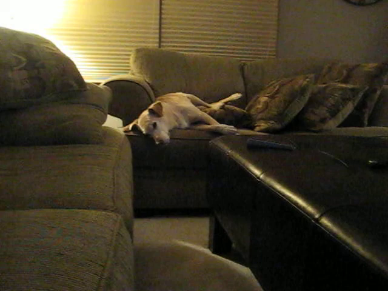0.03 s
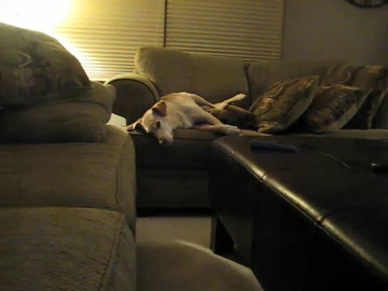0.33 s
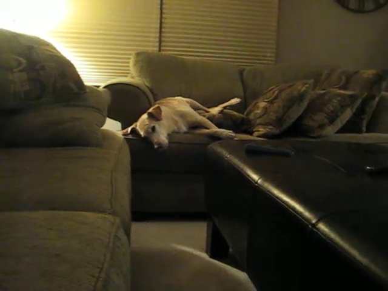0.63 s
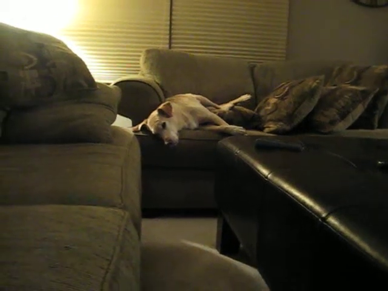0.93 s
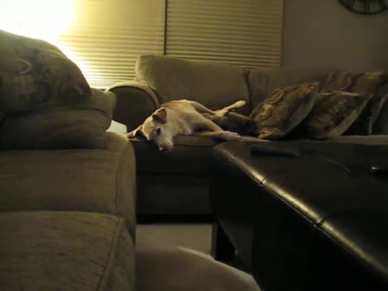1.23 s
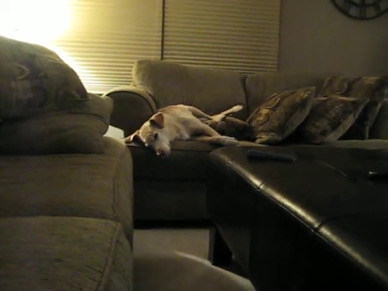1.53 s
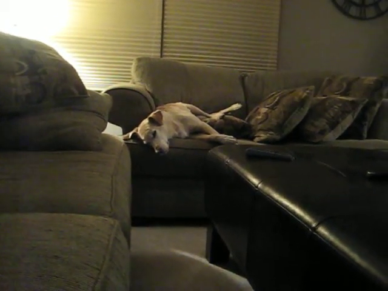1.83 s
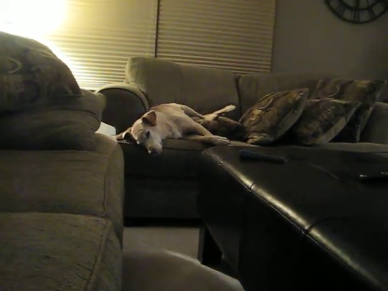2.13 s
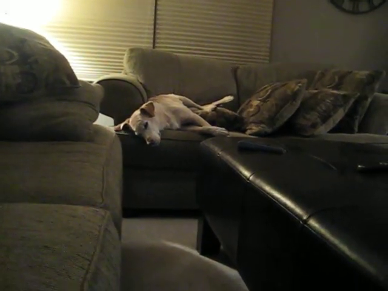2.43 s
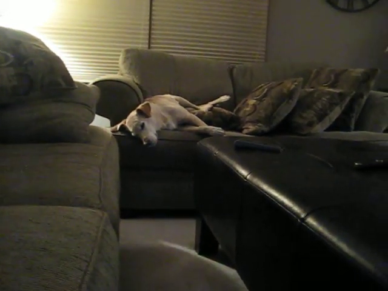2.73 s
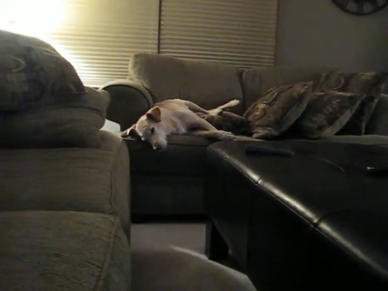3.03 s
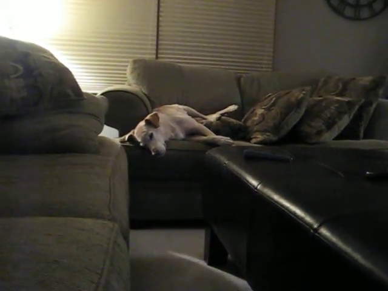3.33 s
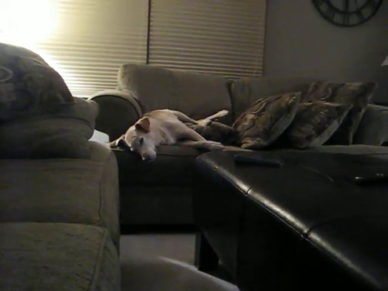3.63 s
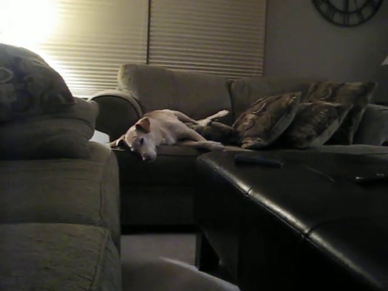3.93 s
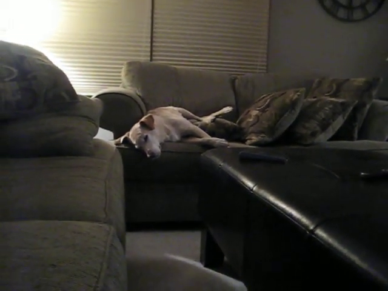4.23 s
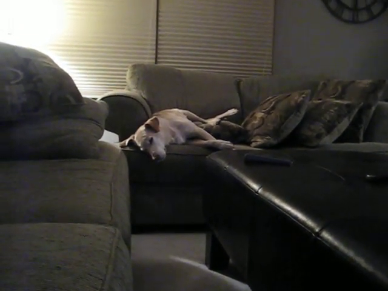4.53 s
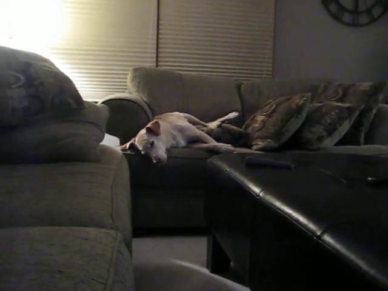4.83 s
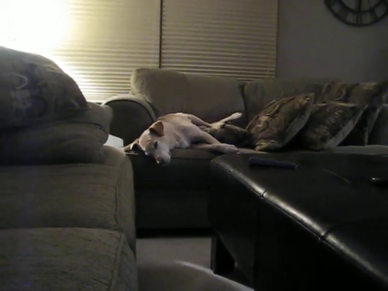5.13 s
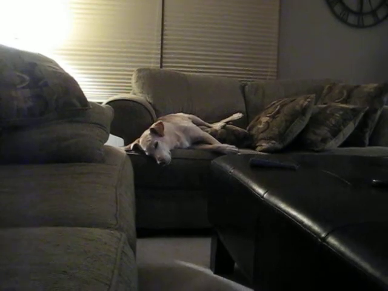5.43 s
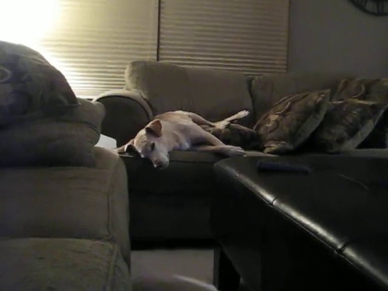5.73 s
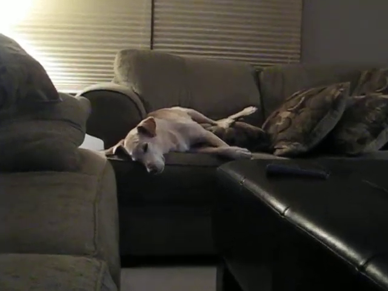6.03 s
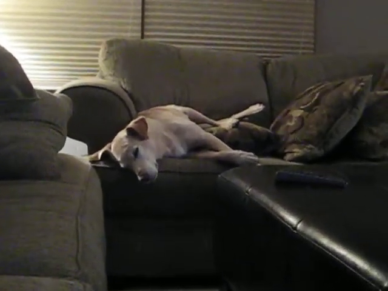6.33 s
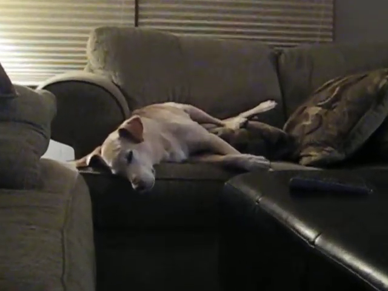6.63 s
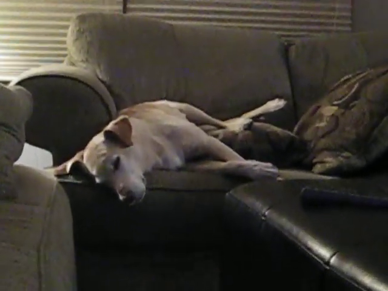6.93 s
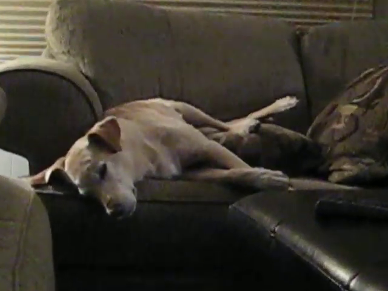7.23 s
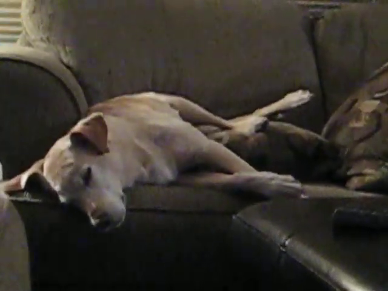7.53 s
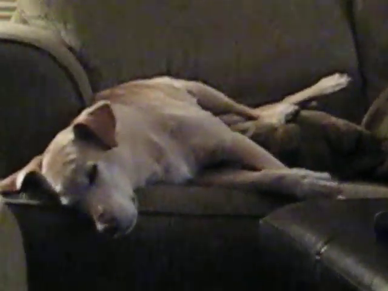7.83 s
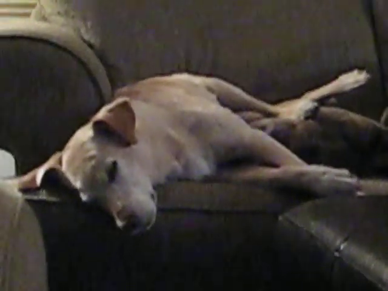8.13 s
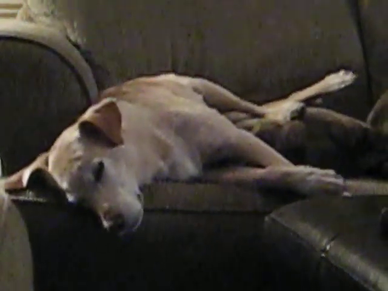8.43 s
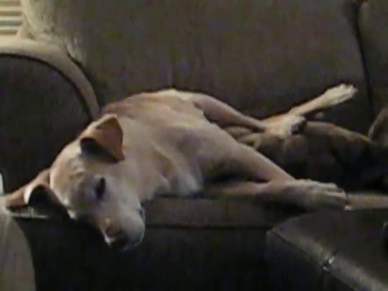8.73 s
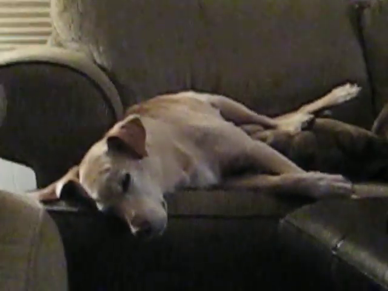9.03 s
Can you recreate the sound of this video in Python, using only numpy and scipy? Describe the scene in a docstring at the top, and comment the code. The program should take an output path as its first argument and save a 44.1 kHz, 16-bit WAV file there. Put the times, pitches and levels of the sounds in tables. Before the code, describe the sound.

Steady microphone hiss and a few close plastic clicks surround a single closed-mouth huff from a sleeping dog.

```python
"""A sleeping dog's huff

A dog asleep on a couch gives one muffled, closed-mouth huff: its loose vocal folds flap in a rough
grunt, then tighten into a short hoot. The living room is quiet under the steady hiss and faint whine
of a handheld camera. The sound starts with a dull click, a soft bump and a fading ring; then fingers
and the zoom lever click on the plastic case."""
import sys
import numpy as np
from scipy import signal
from scipy.fft import rfft, irfft, next_fast_len
from scipy.io import wavfile
from scipy.ndimage import map_coordinates

SR = 44100
rng = np.random.default_rng(int(sys.argv[2]) if len(sys.argv) > 2 else 0)


def to_wav(sig):
    """Store sig (one row per channel, or 1-D mono) as 16-bit WAV at the path in sys.argv[1].

    Samples outside -1..1 are clipped; the rate is SR.
    """
    pcm = np.clip(np.atleast_2d(sig), -1, 1) * 32767
    pcm = np.round(pcm).astype(np.int16)
    wavfile.write(sys.argv[1], SR, pcm.T)  # frames by channels


N = 404838
START_S = .0725  # the camera's sound begins


def amp(db):
    """Turn decibels into a gain."""
    return 10 ** (np.asarray(db) / 20)


def unit(x):
    """Scale a sound to an average (rms) level of 1."""
    return x / np.sqrt(np.mean(x ** 2) + 1e-20)


def clock():
    """The time of every sample, in seconds."""
    return np.arange(N) / SR


def along(points, hz):
    """Read between (frequency, value) points on a log frequency scale."""
    f, v = np.transpose(points)
    return np.interp(np.log(hz + 1), np.log(f + 1), v)


def wobble(rate):
    """A smooth curve through `rate` random values a second."""
    return map_coordinates(rng.standard_normal(int(N * rate / SR) + 4), [clock() * rate])


def fade(t, t60):
    """Die away by 60 dB in t60 seconds, the fade time."""
    return np.exp(-np.log(1000) * t / t60)


def filtered(x, response):
    """Shape a sound; response(f) says how each frequency gets through."""
    size = next_fast_len(N + SR // 2)
    return irfft(rfft(x, size) * response(np.fft.rfftfreq(size, 1 / SR)), size)[:N]


def resonance(f, centre, width):
    """A filter shape that favours frequencies near its centre."""
    return 1j * f * width / (centre ** 2 - f ** 2 + 1j * f * width)


def noise(spectrum):
    """Noise of level 1, shaped by (frequency [Hz], level [dB]) points."""
    return unit(filtered(rng.standard_normal(N), lambda f: amp(along(spectrum, f))))


# the microphone's hiss: (frequency [Hz], relative level [dB])
HISS_SHAPE = [(15, -41), (25, -7.5), (64, -5), (144, -3), (403, -1), (449, -1.5), (791, -1), (881, -2),
              (1040, -1), (1120, -2), (2150, -3.5), (7630, -10), (12700, -16.5), (14600, -15.5),
              (15800, -17.5)]
# thin tones from the electronics: (frequency [Hz], level [dB])
WHINE_TONES = [(1066, -74), (7558, -93), (7881, -90), (15122, -79), (15149, -83)]


def hiss_and_whine(hiss_db=-52, drift=.5):
    """The microphone hisses evenly under the slightly unsteady whine of the electronics."""
    whine = sum(amp(db) * unit(np.sin(2 * np.pi * hz * clock() + drift * wobble(12)))
                for hz, db in WHINE_TONES)
    return amp(hiss_db) * noise(HISS_SHAPE) + whine


def start_ring(ring_hz=968, ring_db=-45, bump_hz=490, bump_db=-40):
    """A soft bump and a thin, fading ring sound as the camera starts."""
    t = np.maximum(clock() - START_S, 0)
    ring = amp(ring_db) * np.sin(2 * np.pi * ring_hz * t) * fade(t, t60=1.16)
    bump = amp(bump_db) * np.sin(2 * np.pi * bump_hz * t) * fade(t, t60=.058)
    return ring + bump


# the tones the plastic case rings at: (frequency [Hz], relative level [dB], fade time [s])
CASE_TONES = [(151, -22, 0.025), (386, -22, 0.054), (679, -4, 0.028), (990, 1, 0.013), (1385, -2.5, 0.012),
              (1806, -4.5, 0.019), (2804, 0, 0.0083), (3600, -1, 0.0079), (3840, -7.5, 0.017),
              (4500, -4, 0.0065), (5680, -8.5, 0.0057), (7500, -13.5, 0.004), (11000, -17.5, 0.0028),
              (15400, -23, 0.0027)]
PIVOT_HZ = 1430  # a harder hit rings more above this frequency and less below


def strike(s, blow_db, ratio=1, scatter_db=1):
    """One hit at time s rings the case; blow_db is its strength at each tone."""
    out, t = np.zeros(N + SR), np.arange(SR // 4) / SR
    hz, tone_db, t60 = np.transpose(CASE_TONES)
    tones = np.sin(2 * np.pi * ratio * hz[:, None] * t)  # the grip detunes the case by `ratio`
    tones *= fade(t, t60[:, None])
    tones[1::2] *= -1  # neighbouring tones move the microphone in opposite directions
    gains = amp(tone_db + blow_db + scatter_db * rng.standard_normal(len(hz)))
    out[round(s * SR):][:len(t)] = gains @ tones
    return out[:N]


# dull bumps as the grip shifts: (time [s], level [dB])
GRIP_BUMPS = [(6.434, -45), (8.51, -40.5)]


def grip_bumps():
    """The soft hand rings only the two lowest tones of the case."""
    out = np.zeros(N)
    for s, db in GRIP_BUMPS:
        t = np.maximum(clock() - s, 0)
        out += amp(db) * sum(np.sin(2 * np.pi * hz * t) * fade(t, t60) for hz, _, t60 in CASE_TONES[:2])
    return out


# a dull click as the sound starts, then fingers tapping the case, the last row a small tick of the zoom lever
# just before it hits its stop: # (time [s], level [dB], hardness [dB per octave], tuning [ratio], bounces
# [count])
CLICK_AND_TAPS = [(0.0752, -35.5, -0.5, 0.97, 0), (0.1766, -23.5, 0.5, .91, 1), (.2121, -24.5, .6, 1.05, 2),
                  (2.574, -47.5, -7, 1.08, 0), (5.481, -45.5, -5.5, 1.02, 0), (5.6233, -44.5, 1, 1.1, 0),
                  (7.005, -35.5, -2.5, 1.05, 0), (7.284, -46, -5, .93, 0), (8.665, -43, -1, 1.1, 0),
                  (8.831, -30, -1.5, .95, 0)]


def click_and_taps(last_hop_s=.0025, hop_ratio=1.6, settle_loss_db=5.5, settle_tilt=3, settle_ratio=.88):
    """A click, then taps: soft ones ring low tones, hard ones high; some bounce faster and settle."""
    hz = np.transpose(CASE_TONES)[0]
    octaves = np.log2(np.clip(hz, 600, 5500) / PIVOT_HZ)
    out = np.zeros(N)
    for s, db, hardness, ratio, bounces in CLICK_AND_TAPS:
        for k in range(bounces + 1):
            blow_db = db + hardness * octaves
            if 0 < k == bounces:  # the last bounce is weaker, duller and lower
                blow_db -= settle_loss_db + settle_tilt * octaves
                ratio *= settle_ratio
            out += strike(s, blow_db, ratio)
            s += last_hop_s * hop_ratio ** (bounces - k - 1)
    return out


# the zoom lever hits its stop: (time [s], level [dB], hardness [dB per octave], extra snap [dB])
LEVER_CLICKS = [(7.342, -22, 1, 0.5), (8.8434, -18.5, 3, 15), (9.092, -14, -.5, 3)]
# the lever's blow, from bass to treble: (frequency [Hz], relative level [dB])
BLOW_SHAPE = [(150, -4), (600, -9), (1050, 1), (1900, -1.5), (2900, -5), (5500, -0.5), (15000, 1.5)]
# the lever's scrape: (frequency [Hz], relative level [dB])
SCRAPE_SHAPE = [(300, -17), (1050, 4), (1800, -1.0), (2500, -8), (3700, 2), (4800, -10), (5900, -5.5),
                (7200, -17), (15000, -24)]


def zoom_lever(swell_s=.013, scrape_db=-18, snap_hz=3050, snap_octaves=.55,
               spring_hz=1100, spring_db=-16):
    """The lever scrapes for an instant, clicks against its stop and leaves its spring ringing."""
    hz = np.transpose(CASE_TONES)[0]
    snap = 1 / (1 + (np.log2(hz / snap_hz) / snap_octaves) ** 4)  # a snap lifts the tones near snap_hz
    friction = noise(SCRAPE_SHAPE)
    out = np.zeros(N)
    for s, db, hardness, snap_db in LEVER_CLICKS:
        before, after = np.maximum(s - clock(), 0), np.maximum(clock() - s, 0)
        scrape = amp(db + scrape_db) * friction * np.exp(-before / swell_s) * (before > 0)
        blow_db = db + along(BLOW_SHAPE, hz) + hardness * np.log2(hz / PIVOT_HZ) + snap_db * snap
        spring = amp(db + spring_db) * np.sin(2 * np.pi * spring_hz * after) * fade(after, t60=.097)
        out += scrape + strike(s, blow_db) + spring
    return out


def case_sounds(low_cut_hz=150):
    """The bumps, clicks and taps together; the small, stiff case passes no deep bass."""
    low_cut = signal.butter(2, low_cut_hz, "high", fs=SR, output="sos")
    return signal.sosfilt(low_cut, grip_bumps() + click_and_taps() + zoom_lever())


# how long the living room echoes: (frequency [Hz], fade time [s])
ROOM_FADES = [(200, 0.32), (600, 0.34), (1200, 0.28), (3000, .18), (10000, 0.15)]


def room(x, echo_db=-12):
    """Add a short, soft echo; the furniture soaks up the treble first."""
    hz, t, spectrum = signal.stft(rng.standard_normal(SR // 2), SR, nperseg=256)
    spectrum *= fade(t, along(ROOM_FADES, hz)[:, None])
    tail = signal.istft(spectrum, SR, nperseg=256)[1]
    tail = np.pad(tail / np.linalg.norm(tail), (SR // 200, 0))  # arrives 5 ms late
    return x + amp(echo_db) * signal.fftconvolve(x, tail)[:N]


# the dog's breath: (time [s], swell time [s], frequency [Hz], width [Hz], level [dB])
AIR_PUFFS = [(5.213, 0.023, 222, 45, -51), (5.3, 0.031, 5850, 1000, -55.5), (5.341, .016, 237, 50, -56.5),
             (5.54, 0.03, 3700, 700, -59)]


def air_puffs():
    """Air puffs out the cheeks and hisses thinly in the nose."""
    out = np.zeros(N)
    for s, swell_s, hz, width, db in AIR_PUFFS:
        air = unit(filtered(rng.standard_normal(N), lambda f: resonance(f, hz, width) ** 2))
        out += air * amp(db) * np.exp(-((clock() - s) / swell_s) ** 2)
    return out


def push(start_s, rise_s, hold_s, t60):
    """One push of breath rises smoothly, holds and dies away."""
    t = clock() - start_s
    rise = np.sin(np.pi / 2 * np.clip(t / rise_s, 0, 1)) ** 2
    return rise * fade(np.maximum(t - rise_s - hold_s, 0), t60)


def nose_ring(source, start_s, glide_s, start_hz=3200, sink_hz_per_s=5300, half_width_hz=100, db=-54):
    """The voice rings in the nose, in one narrow band that sinks as the push goes on."""
    centre_hz = start_hz - sink_hz_per_s * np.clip(clock() - start_s, 0, glide_s)
    shift = np.exp(2j * np.pi * np.cumsum(centre_hz) / SR)
    low_pass = signal.butter(2, half_width_hz, fs=SR, output="sos")
    ring = signal.sosfilt(low_pass, source / shift) * shift  # move the band to 0 Hz, filter, move back
    return unit(ring.real) * amp(db)


# where the throat and closed muzzle ring: (frequency [Hz], width [Hz], relative level [dB])
MUZZLE_RINGS = [(455, 70, 0), (560, 90, 0), (690, 80, -9), (880, 86, -5), (1010, 130, -1), (1135, 124, .5),
                (1340, 165, -4.5), (1860, 140, -7), (2330, 300, -14)]


def muzzle(f, muffle_hz=2800):
    """The throat and muzzle favour a few bands; the closed lips swallow the treble."""
    throat = sum((-1) ** k * amp(db) * resonance(f, hz, width) ** 2  # steep peaks, deep dips between
                 for k, (hz, width, db) in enumerate(MUZZLE_RINGS))
    return throat / (1 + (f / muffle_hz) ** 10)


def grunt(start_s=5.194, t60=.16, db=-32, flap_hz=190, jitter=.3, air_share=.54):
    """Loose vocal folds flap unevenly; their pulses and puffs of air ring in the muzzle and nose."""
    cycles = np.cumsum(flap_hz * np.exp(jitter * wobble(250))) / SR
    pulses = np.diff(np.floor(cycles), prepend=0) * amp(.94 * wobble(150))
    puffs = rng.standard_normal(N) * np.exp(-2 * (cycles % 1))
    source = np.sqrt(1 - air_share) * unit(pulses) + np.sqrt(air_share) * unit(puffs)
    voice = amp(db) * unit(filtered(source, muzzle)) + nose_ring(source, start_s, glide_s=t60)
    return voice * push(start_s, rise_s=.019, hold_s=.042, t60=t60)


# the tones that make up the hoot: (multiple of the pitch [ratio], relative level [dB])
HOOT_TONES = [(1, 1), (2, 3), (3, -13), (4, -10.5), (5, -21)]


def hoot(start_s=5.241, db=-31, low_hz=482, top_hz=556, climb_hz_per_s=1800,
         jitter=.0122, flutter_db=1, overtones_db=-2, pinch_db=7):
    """At the peak of the push the folds tighten into a short, rising tone that ends pinched."""
    pitch_hz = np.minimum(low_hz + climb_hz_per_s * np.maximum(clock() - start_s, 0), top_hz)
    phase = 2 * np.pi * np.cumsum(pitch_hz * (1 + jitter * wobble(250))) / SR
    effort = push(start_s, rise_s=.031, hold_s=.014, t60=.08)
    bright_db = overtones_db + pinch_db * (1 - effort)  # the lowest tone needs the full push
    voice = sum(amp(tone_db + bright_db * (k > 1)) * np.sin(k * phase) for k, tone_db in HOOT_TONES)
    return voice * effort * amp(db + flutter_db * wobble(200))


def scene():
    """One microphone feeds both channels; only the dog is far enough away to make the room echo."""
    huff = grunt() + hoot() + air_puffs()
    mono = room(huff) + case_sounds() + start_ring() + hiss_and_whine()
    return np.array([mono, mono])


def record(dry, top_hz=15850):
    """The camera is silent until it starts, and keeps nothing above top_hz."""
    running = clock() > START_S
    return np.array([filtered(channel * running, lambda f: f < top_hz) for channel in dry])


dry = scene()
out = record(dry)
to_wav(out)
```